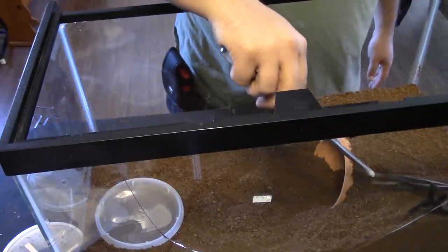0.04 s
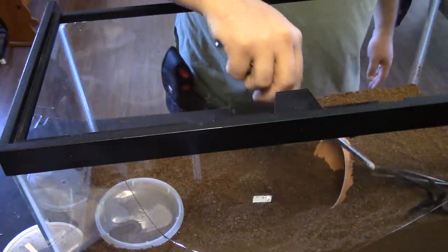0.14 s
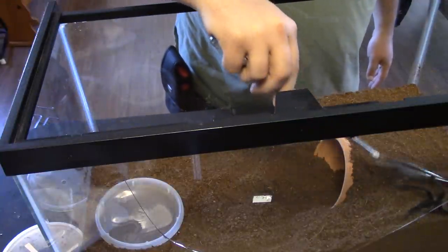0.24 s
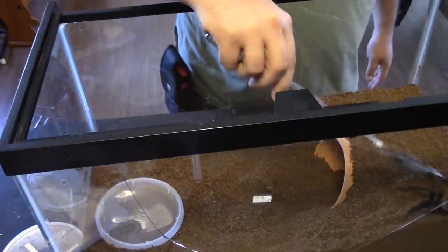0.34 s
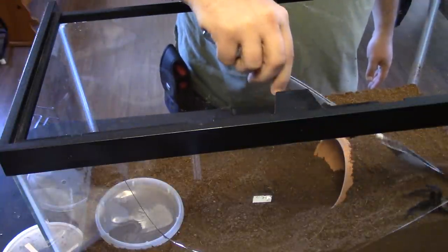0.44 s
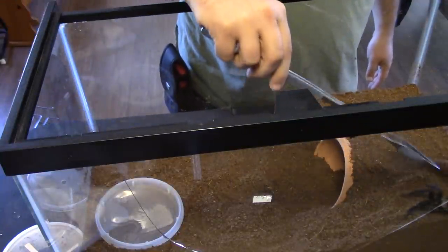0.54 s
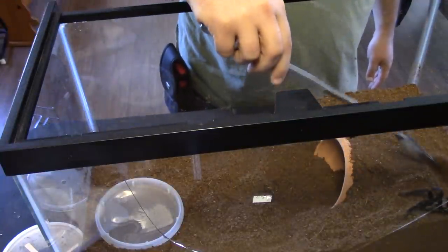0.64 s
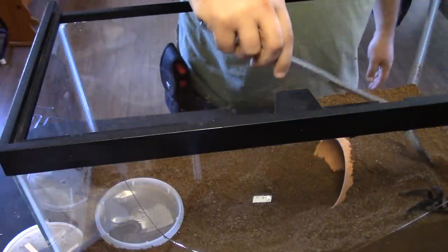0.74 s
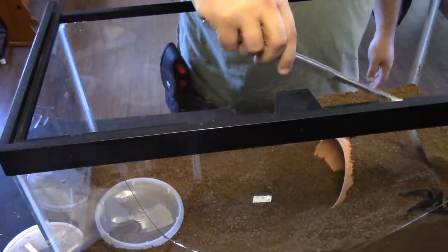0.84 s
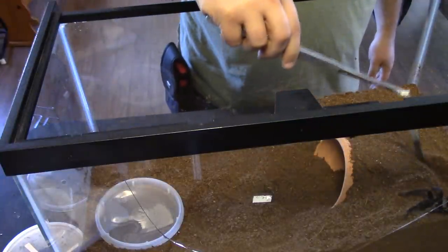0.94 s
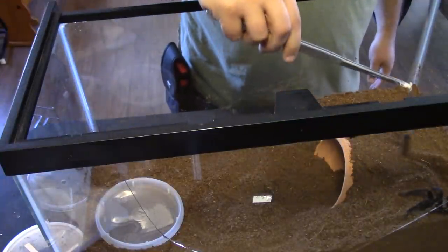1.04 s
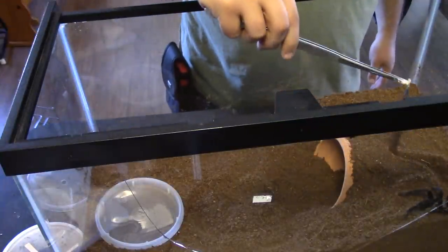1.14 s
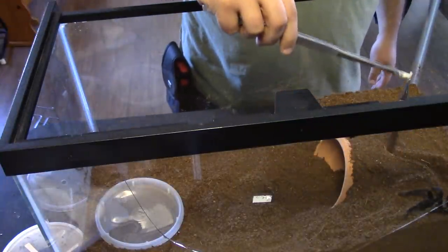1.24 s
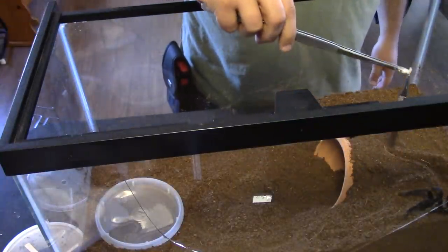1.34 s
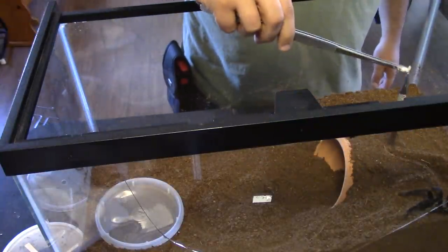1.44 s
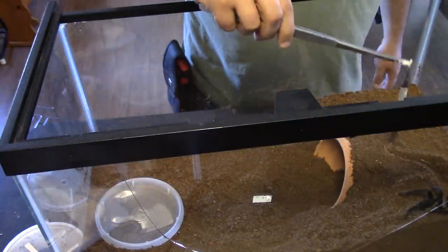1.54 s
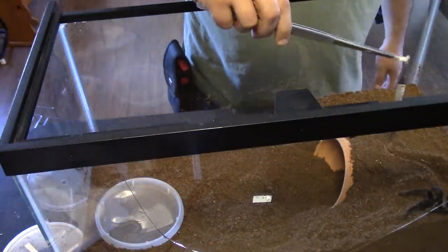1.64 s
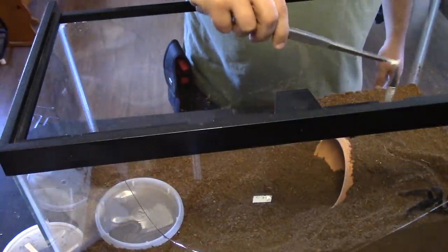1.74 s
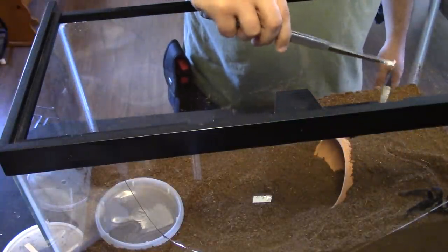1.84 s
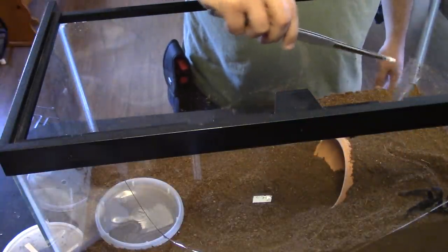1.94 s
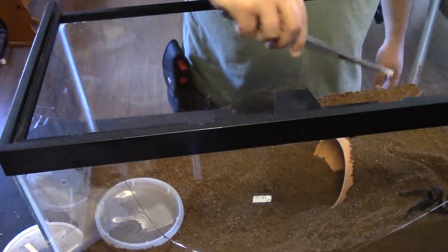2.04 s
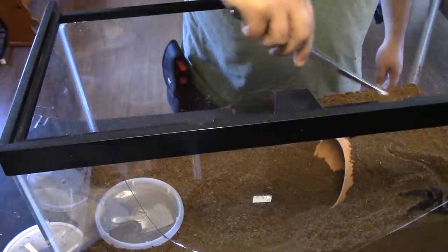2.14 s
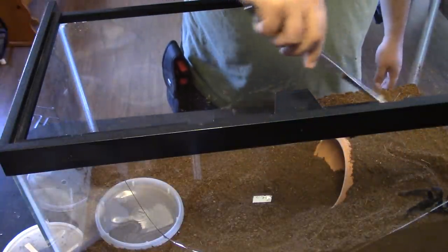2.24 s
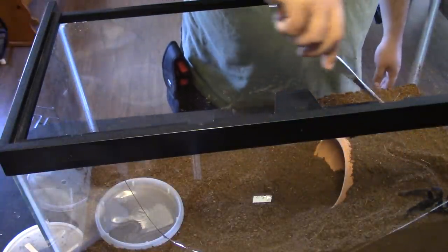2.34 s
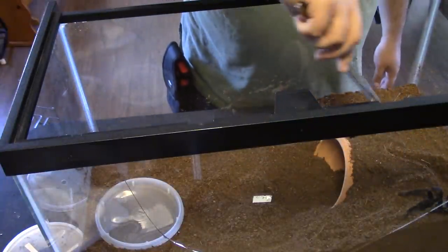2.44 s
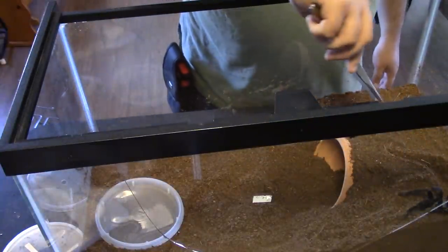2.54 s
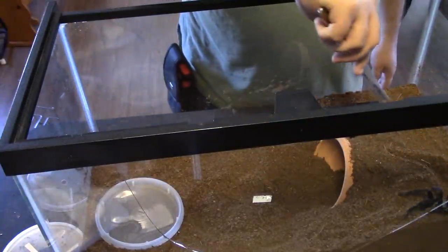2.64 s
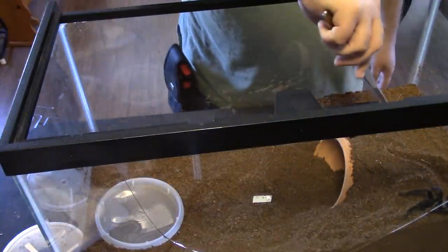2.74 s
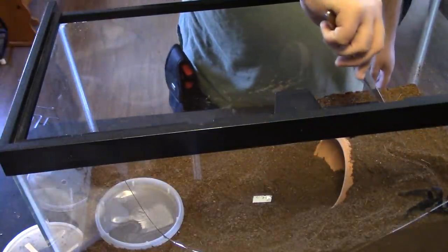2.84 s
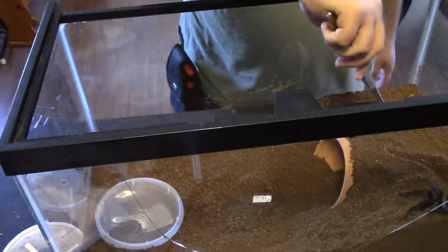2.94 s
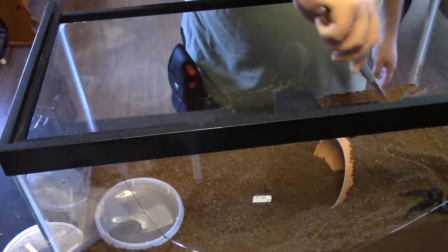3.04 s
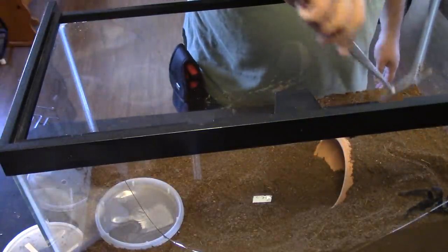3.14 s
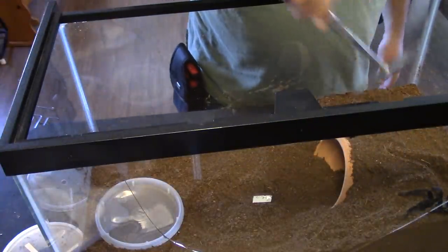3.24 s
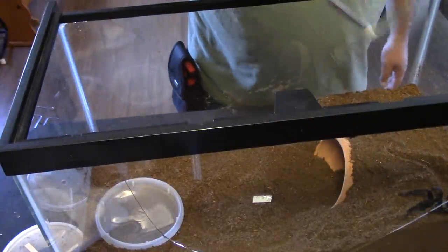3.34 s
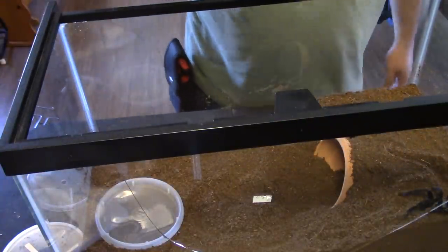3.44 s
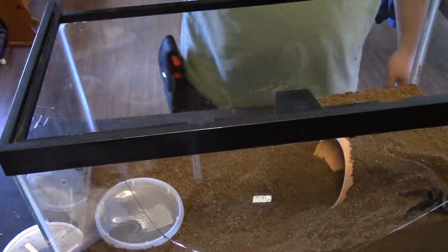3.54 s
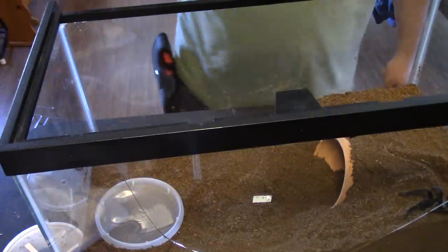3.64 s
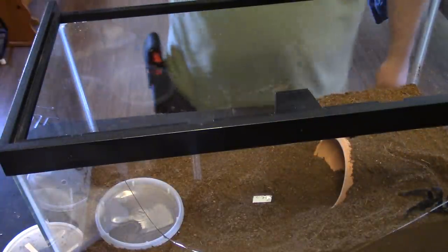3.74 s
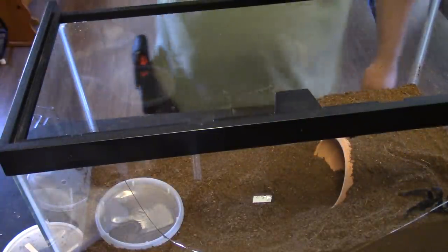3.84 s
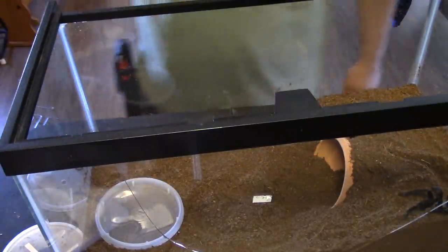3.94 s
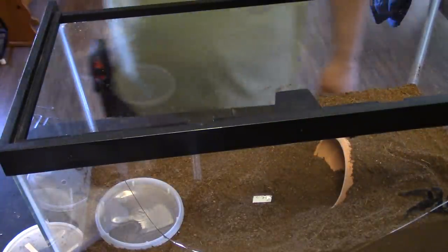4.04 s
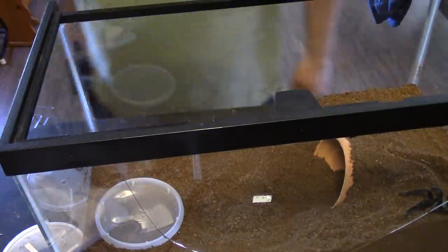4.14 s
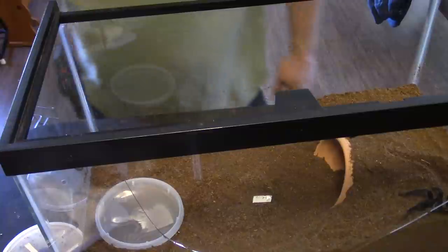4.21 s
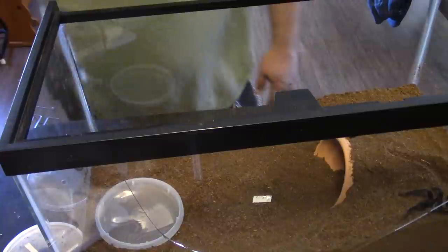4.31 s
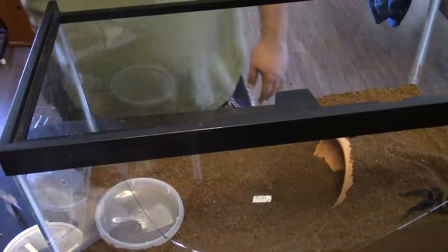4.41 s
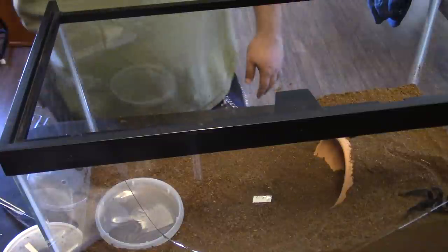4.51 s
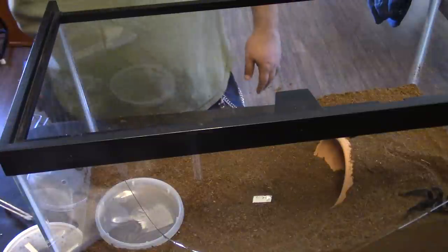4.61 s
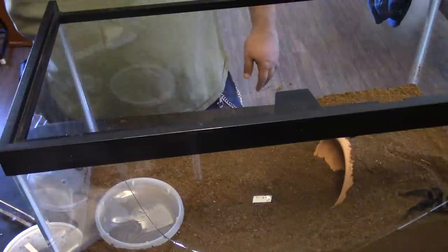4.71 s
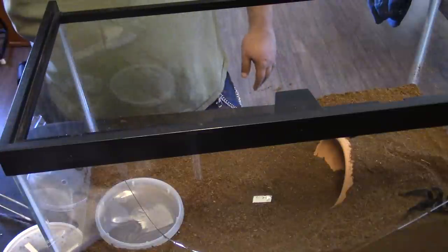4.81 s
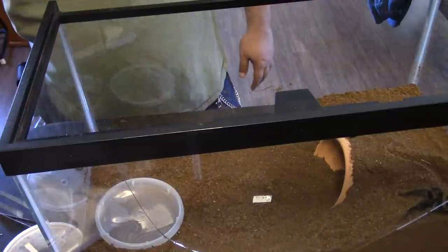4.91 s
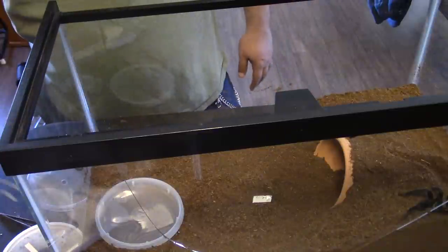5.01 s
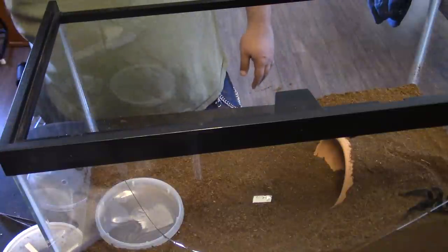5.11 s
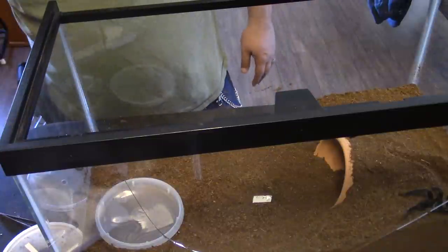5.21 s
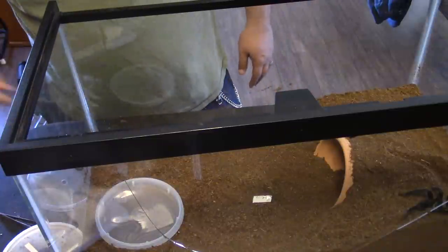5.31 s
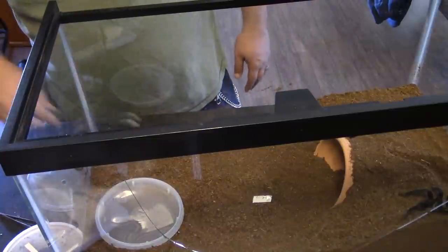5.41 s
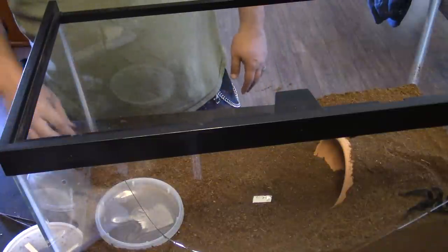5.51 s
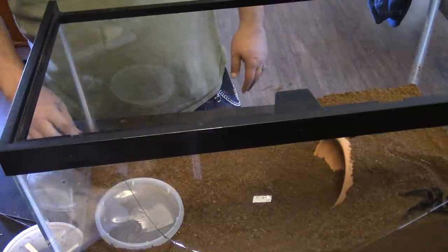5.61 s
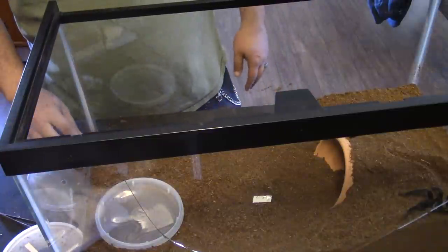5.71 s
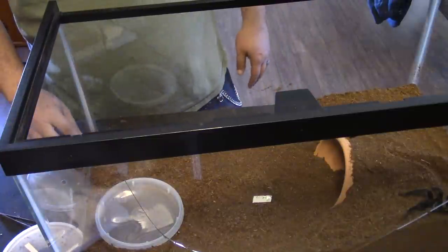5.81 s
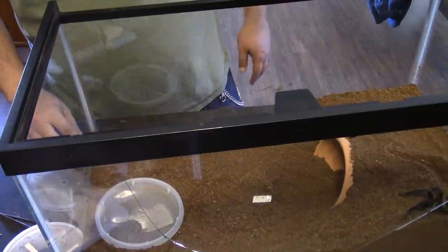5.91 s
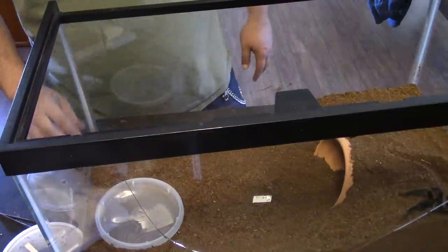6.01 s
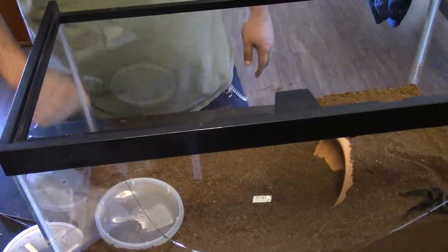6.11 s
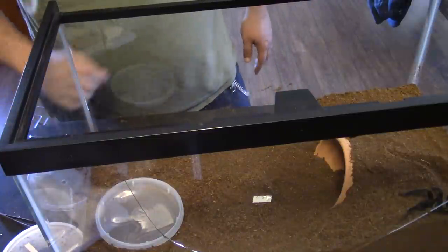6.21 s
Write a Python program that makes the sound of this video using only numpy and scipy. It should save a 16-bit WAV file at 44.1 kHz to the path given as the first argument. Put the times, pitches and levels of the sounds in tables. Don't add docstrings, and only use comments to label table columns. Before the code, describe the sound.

Long steel tongs clink hard and knock on a glass tank, jingle, land clattering on a table, then tumble into a plastic tub.

```python
import sys
import numpy as np
from scipy import signal
from scipy.fft import rfft, irfft, next_fast_len
from scipy.io import wavfile

SR = 44100
rng = np.random.default_rng(int(sys.argv[2]) if len(sys.argv) > 2 else 0)


def unload_wav(signal):
    wavfile.write(
        sys.argv[1],
        SR,
        np.round(np.clip(np.atleast_2d(signal).T, -1, 1) * 32767).astype(np.int16),
    )


def linear_from_db(decibels):
    return 10 ** (np.asarray(decibels, float) / 20)


N = 276154

# [f/Hz, density/(dB per Hz)]
HUSH_MID = [(35, -57.5), (60, -35.5), (112, -6), (242, -10), (394, -7), (533, -9.5), (1800, -20.5),
            (15500, -39)]
HUSH_SIDE = [(15, -37), (25, -20), (287, -2), (598, -5), (1870, -13.5), (9020, -30.5), (11800, -35.5),
             (16400, -49)]
# [f/Hz, width/Hz, level/dB rms]
DRONES = [(124, 12, -68.5), (265, 8.7, -76), (337, 12, -76), (403.8, 24.95, -64)]
# [f/Hz, density/(dB per Hz)]
RUMBLE = [(15, -13), (30, -7), (70, 2.5), (100, -35.5)]
# [t/s, first tick level/dB peak, length/s]
HUNTS = [
    (0, -54, .2),
    (.28, -58, .1),
    (.41, -52.5, .37),
    (1.0, -52, .72),
    (1.95, -55.5, .5),
    (2.411, -57.5, .5),
    (3.15, -57, .4),
    (3.547, -53.5, .85),
    (5.198, -59.5, .45),
]
# [t/s, level/dB peak]
LATE_TICKS = [
    (6.086, -49),
    (6.186, -45),
]

CLINK = [
    (1.8756, 1.5, -12, -31),
]
CLINK_MODES = [(1900, 900, -36), (3150, 110, -13), (4230, 110, -13), (5460, 100, -9), (6800, 170, -16),
               (8280, 140, 2), (9720, 190, 0), (10600, 2500, -24), (11600, 200, -9), (12700, 250, -2),
               (14800, 300, -20)]
CLINK_CROWD = [(290, -65.5), (500, -33), (2840, -15.5), (4600, -17), (7340, -11), (9540, -5.5),
               (13200, -17.5), (16400, -35)]
CLINK_RING = [(2390, -26, .7), (2832, -22, .7), (3780, -27, .6), (4398, -25, .7), (5475, -12, .2),
              (6815, -15, .22), (8301, -4, .11), (8489, -8, .2), (8985, -7, .13), (9722, -9, .18),
              (11520, -4, .12), (11860, -11, .25), (12760, -11, .2), (13360, -9, .15)]
KNOCK = [
    (2.0148, 0.2, -10.5, -30.5),
    (2.0178, -7.5, -23.5, -44.5),
]
KNOCK_MODES = [(263.8, 57, 0), (546.6, 9.2, 9), (914, 74, -2.5), (1126, 100, -3), (1644, 184, -0.5),
               (2280, 180, -5.5), (4665, 170, -4.5), (5625, 410, -13), (6317, 1200, -20), (8470, 170, -28),
               (8600, 230, -25), (11500, 300, -18)]
KNOCK_CROWD = [(71, -51.5), (150, -4.5), (561, -10), (1640, -3.5), (3200, -18), (6300, -22), (10000, -37.5),
               (16400, -33)]
KNOCK_RING = [(3865, -5, .2), (4393, -20, .3), (6040, -24, .25), (7913, -20, .25), (8419, -7, .22),
              (8930, -10, .1), (10320, -1, .085), (11710, -8, .13), (11850, -23, .2), (12640, -6, .086),
              (13360, -15, .12), (14880, -3, .08)]
REBOUND = [
    (2.025, -1.5, 0, -23.5),
]
REBOUND_MODES = [(259, 35, 0), (568.4, 45, 1.5), (1170, 150, -11), (1576, 150, -3), (2030, 120, -4.5),
                 (2470, 200, -10), (3313, 150, -11), (3900, 170, -9.5), (5200, 300, -29), (6170, 200, -29),
                 (8350, 100, -26)]
JINGLE = [
    (2.568, -57, -8, -2),
    (2.603, -49, -12, -12),
    (2.607, -45.5, -15, -9),
    (2.611, -56, -12, -20),
    (2.6839, -17.5, -1, -22),
    (2.6927, -28.5, -28, -8.5),
    (2.699, -30, -24, -15),
]
JINGLE_MODES = [(3340, 250, -15), (5960, 130, -2), (9000, 630, -8.5), (9700, 410, -3), (11040, 250, -13),
                (13000, 160, 3.5)]
JINGLE_CROWD = [(1470, -36), (2500, -18), (5110, -18), (5800, -10), (6420, -18), (12400, -5),
                (15400, -30.5), (16400, -54.5)]
JINGLE_RING = [(3591, -6, .07), (4404, -21, .12), (4867, -22, .14), (5588, -12, .09), (5950, -10, .06),
               (7714, -14, .075), (8926, -11, .16), (9189, -1, .038), (9733, -10, .064), (10170, -14, .09),
               (10320, -13, .15), (10920, -12, .062), (11850, -17, .08), (12810, -9, .066)]
# [t/s, level/dB peak]; clear modes (columns as above)
CHATTER_CONTOUR = [
    (2.7395, -32),
    (2.748, -27.5),
    (2.757, -29),
    (2.768, -34),
    (2.777, -42),
]
CHATTER_MODES = [(3470, 120, -21), (5570, 110, -16), (7790, 22, -7), (8560, 26, -2.5), (9160, 51, -15),
                 (10300, 90, -7), (10306, 28, -8), (10800, 37, -11), (12100, 86, 3), (12900, 150, -19),
                 (14100, 50, -23), (14900, 37, -22)]
CLOSING = [
    (2.8171, -33, -13, -12.5),
    (2.829, -33, -9, -10),
    (2.846, -48, 0, -25),
    (2.856, -42, 0, -16),
    (2.864, -47, 0, -25),
    (2.872, -49, -3, -27),
    (2.88, -39, 0, -28),
    (2.8865, -40, 0, -27),
]
CLOSING_MODES = [(3630, 170, -7), (5800, 170, -6), (8570, 200, -5), (9100, 200, -2), (10600, 200, -8),
                 (12100, 200, -8), (12860, 150, 8)]
CLOSING_RING = [(3850, -7, 0.13), (4420, -15, 0.14), (5750, -2, 0.093), (6045, -6.5, 0.14),
                (8250, -14, 0.17), (9230, -13, 0.23), (10440, -12, .05), (10910, -17, .2), (12090, -6, .05),
                (12830, -17, .15)]
BUMP = [
    (3.0095, -32.5, 27),
    (3.015, -28, 12.5),
    (3.024, -34.5, -10),
    (3.862, -41, -18),
    (3.883, -49, -19),
]
BUMP_MODES = [(237, 15, 4), (797, 55, -14.5), (996, 110, -13)]
BUMP_CROWD = [(59, -43), (100, -1.5), (260, -4.5), (633, -17), (1000, -22), (1440, -35), (2500, -35),
              (3250, -68)]
TAP = [
    (3.0234, -43, -3),
    (3.0448, -20.5, 0),
    (3.0516, -21, -15),
]
TAP_MODES = [(234, 40, -4.5), (934, 167, 3), (1790, 140, -9), (3370, 120, -4.5), (5140, 116, -3.5),
             (5980, 140, -6), (7480, 150, -8), (8270, 270, -5.5), (11300, 230, -17.5), (13000, 300, -11)]
TAP_CROWD = [(88, -13), (150, -1), (1010, -8), (1430, -22), (1820, -8), (6510, -15), (12400, -13.5),
             (16400, -41)]
SETTLING = [
    (3.972, -52, 6),
    (4.42, -38, -9),
    (4.431, -35, -3),
    (4.4365, -33, 0),
    (4.4425, -37, 1),
    (4.4445, -42, 0),
    (4.4478, -43, 0),
    (4.456, -42, 0),
    (4.4665, -37, -3),
]
SETTLING_MODES = [(4800, 900, -3), (6830, 830, -0.5), (8800, 1200, -4), (13000, 1500, -10)]
SET_DOWN = [
    (4.4119, -5.5, 2.5),
    (4.4165, -13.5, -19),
    (4.424, -39, -39),
    (4.4428, -23, -26),
]
SET_DOWN_MODES = [(250, 20, 20), (703, 76, -8), (1480, 180, 10), (2870, 440, 5.5), (7050, 870, -34),
                  (8600, 1100, -6), (13000, 2500, -33)]
SET_DOWN_CROWD = [(71, -58), (237, 2), (450, -13), (675, 0.5), (1540, -7), (2900, -9.5), (13100, -24.5),
                  (16400, -52)]
TABLE = [
    (4.6445, -22.5, -29),
    (4.657, -23.5, -26),
    (4.7045, -25, -23),
    (4.7235, -21.5, -24),
    (4.782, -27, -23),
    (4.787, -26.5, -16),
    (4.791, -24.5, -14),
]
TABLE_MODES = [(235, 23, -30), (480, 110, 11.5), (716, 47, -28.5), (2590, 210, 9), (3680, 230, -3.5),
               (6060, 460, -13)]
TABLE_CROWD = [(71, -60), (191, -5), (680, -0.5), (1890, -5.5), (3300, -9.5), (5040, -22), (12000, -26.5),
               (16400, -70)]
RATTLE = [(4.7046, -33, -10, -6), (4.7134, -38, -16, -22), (4.723, -37, -17, -2), (4.7354, -36, -14, -15),
          (4.782, -27.5, 7, -9), (4.7875, -29, 0, -20), (4.7915, -28.5, 3, -17), (4.797, -36, 0, -13),
          (4.8033, -27.5, 0, -12.5), (4.8094, -34, -14, -15), (4.8755, -40, -2, -30), (4.896, -49, -2, -30)]
RATTLE_MODES = [(6100, 150, -6), (7700, 140, 11), (10800, 150, 4), (13900, 58, -6)]
RATTLE_CROWD = [(2350, -31), (4000, -12), (5090, -18), (7650, -11), (9750, -10.5), (13200, -8),
                (15500, -23), (16400, -40)]
RATTLE_RING = [(3903, -20, .2), (5486, -12, .22), (5997, -8, .15), (6600, -16, .12), (7655, -11, .22),
               (8450, -14, .15), (9259, -12, .12), (10330, -12, .2), (10900, -14, .12), (11770, -10, .18),
               (12840, 0, .06), (13560, -12, .1), (14850, -10, .12)]
DROP = [
    (4.8753, -12.5, 9),
    (4.8851, -29, 3),
    (4.8951, -17, 1),
    (4.906, -28, -9),
    (4.911, -25.5, 7),
    (4.926, -44, -34),
]
DROP_MODES = [(447, 40, -1), (694, 40, -1), (991, 90, -5), (1700, 120, -10), (2600, 180, 6), (2950, 200, 2),
              (3680, 200, 3), (5960, 250, -13), (6590, 250, -13)]
TUB = [
    (5.5205, -41, 2, -40),
    (5.528, -45, -15, -41),
    (5.5645, -12.5, -16, -21),
    (5.5666, -12.5, -29, -33),
    (5.7545, -30.5, -36, -42),
]
TUB_MODES = [(612, 184, -3), (960, 80, -14), (1485, 99, 5), (2774, 180, -6), (3230, 75, -11),
             (3970, 110, -13), (4720, 100, -19), (5120, 150, -17), (6310, 180, -13), (7150, 120, -21)]
TUB_CROWD = [(120, -17), (520, -13.5), (1180, -24.5), (1500, -8), (1900, -27), (2800, -25), (4400, -30.5),
             (16400, -40)]
TUB_RING = [(1450, -2, 0.064), (2690, -5, 0.21), (3280, -5.5, 0.23), (3850, -12, 0.12), (5270, -13, 0.23),
            (6550, -21, .18)]
ROCK = [
    (5.7975, -15.5, -2),
    (5.805, -33, -1),
    (5.814, -16.5, -9.5),
]
ROCK_MODES = [(260, 15, -3.5), (460, 19, 1), (707, 30, -1.5), (1380, 73, -9), (1860, 120, -15),
              (2770, 86, -15.5), (3600, 100, -32), (4420, 88, -37), (5340, 260, -46), (6300, 300, -30),
              (8500, 110, -39), (9100, 160, -36.5)]
TUMBLE = [
    (5.8332, -14, -19, -60),
    (5.8365, -14.5, -40, -60),
    (5.844, -11.5, -10, -22),
    (5.8495, -13.5, -37, -63),
    (5.856, -17.5, -25, -60),
    (5.8605, -13, -28, -57),
    (5.8635, -19, -25, -60),
    (5.877, -23, -28, -60.5),
]
TUMBLE_MODES = [(262, 17, 0), (442, 27, -6), (755, 22, -3), (826, 78, -5.5), (1376, 68, -4.5),
                (2060, 130, -5.5), (2760, 150, -8.5), (3740, 460, -14), (6500, 680, -23)]
TUMBLE_CROWD = [(100, -50), (257, -8.5), (343, -24), (448, -16.5), (1360, -16), (2090, -20), (5280, -30),
                (16400, -53.5)]
TUMBLE_RING = [(3640, 4, .28), (5809, -5, .3), (8533, -15, .36), (10900, -19, .3), (11630, -18, .3),
               (15160, -23, .28)]

# [f/Hz, t60/s, level/dB]
ROOM = [(117, 0.074, -1), (495, 0.29, -0.5), (2000, 0.26, -1.5), (6090, 0.28, -3.5), (14000, 0.23, -2)]
# [t of peak/s, level/dB peak, swell/s, fade/s]
RUSTLE = [
    (3.39, -63.5, 0.043, .05),
    (3.53, -63, 0.092, 0.096),
    (4.205, -57.5, 0.11, 0.12),
    (4.12, -63, 0.6, 0.6),
    (4.65, -58, .5, 0.43),
]
# [f/Hz, density/(dB per Hz)]
RUSTLE_COLOUR = [(400, -21), (1500, 10), (3800, 3), (5500, -1), (8000, -6), (14000, -17.5), (17000, -40)]


def at_hz(points, hz):
    points = np.array(points)
    return np.interp(np.log(hz + 1e-9), np.log(points[:, 0]), points[:, 1])


def coloured(spectrum, size=N):
    fast = next_fast_len(size)
    hz = np.fft.rfftfreq(fast, 1 / SR)
    noise = irfft(rfft(rng.standard_normal(fast)) * linear_from_db(at_hz(spectrum, hz)), fast)[:size]
    return noise / noise.std()


def filtered(x, order, hz, kind="low"):
    return signal.sosfilt(signal.butter(order, hz, kind, fs=SR, output="sos"), x)


def add(out, at_s, sound):
    i = round(at_s * SR)
    out[i:i + len(sound)] += sound[:N - i]


def hush():
    out = linear_from_db(-56.5) * filtered(coloured(HUSH_MID), 2, 14500)
    for hz, width_hz, level_db in DRONES:
        peak = [(hz - 4 * width_hz, -60), (hz, 0), (hz + 4 * width_hz, -60)]
        out = out + linear_from_db(level_db) * coloured(peak)
    return out


def focus_motor():
    tick_hz, tick_s, period_s, first_s = 1887, 0.00886, 2002 / 30000, .02
    settle_db_per_s, rest_db = 6, -63.5
    out = np.zeros(N)
    t = np.arange(round(tick_s * SR)) / SR
    tick = np.sin(2 * np.pi * tick_hz * t) * np.sin(np.pi * t / tick_s) ** 2
    at_s = np.arange(first_s, N / SR, period_s)
    hunts_db = []
    for start_s, first_db, length_s in HUNTS:
        active = (at_s >= start_s) & (at_s < start_s + length_s)
        hunts_db.append(np.where(active, first_db - settle_db_per_s * (at_s - start_s), rest_db))
    levels_db = np.max(hunts_db, axis=0) + rng.normal(0, 1.5, len(at_s))
    at_s = at_s + rng.normal(0, .0015, len(at_s))
    for s, peak_db in list(zip(at_s, levels_db)) + LATE_TICKS:
        add(out, s, linear_from_db(peak_db) * tick)
    return out


def decaying(hz, db, t60_s, length_s, signs, contact_s):
    t = np.arange(round(length_s * SR), dtype=np.float32)[:, None] / np.float32(SR)
    turn = np.float32(2 * np.pi * hz)
    fade = np.float32(np.log(1000) / t60_s)
    waves = np.sin(turn * t) * np.exp(np.maximum(-fade * t, -40))
    waves = waves * (1 - np.exp(-np.minimum(t / np.float32(contact_s), 5) ** 2))
    return waves @ np.float32(signs * linear_from_db(db))


def ringing(ring, level_db, chance, contact_s, swell_s):
    twin_split, twin_db, swell_below_hz = .004, -14, 4600
    hz, db, t60_s = np.transpose(ring)
    db = level_db + db + chance[-len(ring):]
    hz = np.r_[hz, hz * (1 + twin_split * chance[:len(ring)])]
    t60_s = np.tile(np.clip(t60_s, .02, .7), 2)
    rise_s = np.where(hz < swell_below_hz, swell_s, contact_s)
    return decaying(hz, np.r_[db, db + twin_db], t60_s, 0.52, np.sign(chance[:len(hz)]), rise_s)


def strikes(touches, modes, crowd, ring=None, crowd_db=-3.0, crowd_t60_s=.03, contact_s=0.000043,
            sharp=False, swell_s=0.00087):
    out, count, spread_db = np.zeros((2, N)), 70, 2
    mode_hz, width_hz, mode_db = np.transpose(modes)
    mode_db = mode_db + 20 * np.log10(width_hz)
    mode_t60_s = np.log(1000) / np.pi / width_hz
    low, high = np.sqrt([crowd[0][0], crowd[-1][0]])
    usual_db = np.mean([touch[2] for touch in touches])
    luck = rng.normal(0, 1, (len(touches), 2 * count))
    places = rng.random((len(touches), count))
    for (s, peak_db, bright_db, *share_db), chance, place in zip(touches, luck, places):
        crowd_hz = (low + (high - low) * (np.arange(count) + place) / count) ** 2
        t60_s = crowd_t60_s * (crowd_hz / 2000) ** -.4
        small_db = at_hz(crowd, crowd_hz) + 5 * np.log10(crowd_hz) - 10 * np.log10(t60_s)
        hz = np.r_[mode_hz, crowd_hz]
        db = np.r_[mode_db - mode_db.max(), small_db - small_db.max() + crowd_db]
        tilt_db = 0.21 * (bright_db - usual_db) * np.log2(hz / crowd_hz[count // 2])
        db = db + tilt_db + spread_db * chance[:len(hz)]
        signs = np.sign(chance[::-1][:len(hz)] + 9 * sharp)
        blow = decaying(hz, db, np.r_[mode_t60_s, t60_s], .1, signs, contact_s)
        add(out[0], s, linear_from_db(peak_db) * blow / np.abs(blow).max())
        if ring:
            add(out[1], s, ringing(ring, peak_db + share_db[0], chance, contact_s, swell_s))
    return out


def tongs_in_hand():
    gap_s, jitter_s = .0036, 0.0012
    clink = strikes(CLINK, CLINK_MODES, CLINK_CROWD, CLINK_RING, crowd_db=-23.0, crowd_t60_s=.04,
                    contact_s=.00006, sharp=True, swell_s=.045)
    jingle = strikes(JINGLE, JINGLE_MODES, JINGLE_CROWD, JINGLE_RING, crowd_db=-18.0, crowd_t60_s=0.075,
                     contact_s=0.0002)
    chatter_s = np.arange(CHATTER_CONTOUR[0][0], CHATTER_CONTOUR[-1][0], gap_s)
    chatter_s = chatter_s + rng.normal(0, jitter_s, len(chatter_s))
    chatter_db = np.interp(chatter_s, *np.transpose(CHATTER_CONTOUR))
    touches = [(s, db, 0) for s, db in zip(chatter_s, chatter_db)]
    chatter = strikes(touches, CHATTER_MODES, JINGLE_CROWD, crowd_db=-15.0, crowd_t60_s=0.063,
                      contact_s=0.00024)
    closing = strikes(CLOSING, CLOSING_MODES, JINGLE_CROWD, CLOSING_RING, crowd_db=-17.5, crowd_t60_s=0.074,
                      contact_s=0.0003)
    return clink + jingle + chatter + closing


def grain(size):
    jumps = linear_from_db(2.5 * rng.standard_normal(size // 64 + 2))
    jumps = jumps / np.sqrt(np.mean(jumps ** 2))
    return np.interp(np.arange(size) / 64, np.arange(len(jumps)), jumps)


def shiver(touches, crowd, level_db, t60_s, dull_hz, modes=(), modes_db=0.0, width_hz=50.0):
    out, t = np.zeros(N), np.arange(2 ** 14) / SR
    for s, peak_db, *_ in touches:
        envelope = linear_from_db(peak_db + level_db - 60 * t / t60_s) * np.minimum(t / 0.0035, 1)
        add(out, s, envelope * coloured(crowd, size=len(t)) * grain(len(t)))
    flicker = 0
    for hz, *_ in modes:
        flicker = flicker + signal.lfilter(*signal.iirpeak(hz, hz / width_hz, fs=SR), out + 1e-18)
    return filtered(out + linear_from_db(modes_db) * flicker, 2, min(dull_hz, .45 * SR))


def buzzing():
    steel = shiver(CLINK, CLINK_CROWD, level_db=-37.5, t60_s=0.26, dull_hz=13950,
                   modes=CLINK_RING[4:], modes_db=7.0, width_hz=47.0)
    steel = steel + shiver(RATTLE, RATTLE_CROWD, level_db=-22.5, t60_s=0.28, dull_hz=16000,
                           modes=RATTLE_RING, modes_db=9.5, width_hz=70.0)
    tank = shiver(KNOCK[:1] + REBOUND, KNOCK_CROWD, level_db=-24.5, t60_s=0.3, dull_hz=12000)
    tank = tank + shiver(TAP, TAP_CROWD, level_db=-30.5, t60_s=0.25, dull_hz=9960,
                         modes=TAP_MODES[1:], modes_db=8.0, width_hz=90.0)
    table = shiver(SET_DOWN[:1], SET_DOWN_CROWD, level_db=-21.5, t60_s=0.34, dull_hz=15900)
    table = table + shiver(TABLE + DROP, TABLE_CROWD, level_db=-17.5, t60_s=0.3, dull_hz=7940)
    tub = shiver(TUB, TUB_CROWD, level_db=-27, t60_s=0.42, dull_hz=9100,
                 modes=TUB_MODES[3:], modes_db=8.5, width_hz=100.0)
    tub = tub + shiver(ROCK, TUMBLE_CROWD, level_db=-18.5, t60_s=0.46, dull_hz=2550)
    tub = tub + shiver(TUMBLE, TUMBLE_CROWD, level_db=-18, t60_s=0.34, dull_hz=6170)
    return steel + tank + table + tub


def room(x):
    rise_s, side_db = 0.014, -24
    t = np.arange(SR // 2) / SR
    white, tail = rng.standard_normal((2, len(t))), 0
    for hz in 62.5 * 2 ** np.arange(9):
        edges_hz = [hz / np.sqrt(2), min(hz * np.sqrt(2), .45 * SR)]
        t60_s = at_hz(ROOM, hz)
        level_db = at_hz(np.array(ROOM)[:, ::2], hz)
        fade = linear_from_db(level_db - 60 * t / t60_s) / np.sqrt(SR * t60_s / np.log(1e6))
        tail = tail + filtered(white, 2, edges_hz, "band") * fade
    tail = tail * (1 - np.exp(-(t / rise_s) ** 2))
    return signal.fftconvolve(x[None], tail, axes=1)[:, :N] * linear_from_db(np.array([[0], [side_db]]))


def tank_blows():
    knock = strikes(KNOCK, KNOCK_MODES, KNOCK_CROWD, KNOCK_RING, crowd_db=-19.0, crowd_t60_s=0.032,
                    contact_s=0.00026, swell_s=.02)
    rebound = strikes(REBOUND, REBOUND_MODES, KNOCK_CROWD, KNOCK_RING, crowd_db=-20.0, crowd_t60_s=0.047,
                      contact_s=0.00039, swell_s=0.019)
    bump = strikes(BUMP, BUMP_MODES, BUMP_CROWD, crowd_db=-6.5, crowd_t60_s=0.017, contact_s=0.0015)
    tap = strikes(TAP, TAP_MODES, TAP_CROWD, crowd_db=-23.5, crowd_t60_s=0.062, contact_s=0.00073)
    return knock + rebound + bump + tap


def rustle():
    t, power = np.arange(N) / SR, 0
    for s, peak_db, swell_s, fade_s in RUSTLE:
        away = np.where(t < s, (s - t) / swell_s, (t - s) / fade_s)
        power = power + linear_from_db(peak_db - 20 * away) ** 2
    return np.sqrt(power) * coloured(RUSTLE_COLOUR)


def table_blows():
    settling = strikes(SETTLING, SETTLING_MODES, RATTLE_CROWD, crowd_db=-17.0, crowd_t60_s=0.0076,
                       contact_s=0.0001)
    set_down = strikes(SET_DOWN, SET_DOWN_MODES, SET_DOWN_CROWD, crowd_db=-12.5, crowd_t60_s=0.012,
                       contact_s=0.0001, sharp=True)
    knocks = strikes(TABLE, TABLE_MODES, TABLE_CROWD, crowd_db=-10.0, crowd_t60_s=0.009, contact_s=0.00014)
    rattle = strikes(RATTLE, RATTLE_MODES, RATTLE_CROWD, RATTLE_RING, crowd_db=2.0, crowd_t60_s=0.051)
    drop = strikes(DROP, DROP_MODES, TABLE_CROWD, crowd_db=-18.5, crowd_t60_s=0.022, contact_s=0.00036)
    return settling + set_down + knocks + rattle + drop


def tub_blows():
    knocks = strikes(TUB, TUB_MODES, TUB_CROWD, TUB_RING, crowd_db=-18.5, crowd_t60_s=0.06, contact_s=0.00027)
    rock = strikes(ROCK, ROCK_MODES, TUMBLE_CROWD, crowd_db=-18.0, crowd_t60_s=0.018, contact_s=0.00026)
    tumble = strikes(TUMBLE, TUMBLE_MODES, TUMBLE_CROWD, TUMBLE_RING, crowd_db=-20.0, crowd_t60_s=0.03,
                     contact_s=0.0003, swell_s=.05)
    return knocks + rock + tumble


def scene():
    ring_wet, mic_low_hz = .55, 125.1
    clinks, clink_ring = tongs_in_hand()
    blows, blow_ring = tank_blows() + table_blows() + tub_blows()
    near = clinks + clink_ring + (1 - ring_wet) * blow_ring
    far = blows + ring_wet * blow_ring + buzzing()
    wet_mid, wet_side = room(linear_from_db(-16) * near + far)
    blows_mid, blows_side = filtered([near + far + wet_mid, wet_side], 3, mic_low_hz, "high")
    mid = blows_mid + hush() + linear_from_db(-83.5) * coloured(RUMBLE) + rustle() + focus_motor()
    treble = filtered(near + far, 2, 3000, "high")
    off_body = linear_from_db(-18.0) * np.roll(treble, 25)
    side = blows_side + off_body + linear_from_db(-66) * coloured(HUSH_SIDE)
    return np.array([mid + side, mid - side])


def band_limit(x):
    return signal.sosfilt(signal.butter(12, 16530, fs=SR, output="sos"), x)


def record(dry):
    treble_end_hz = 15800
    dull = filtered(dry, 10, treble_end_hz)
    return band_limit(np.clip(dull, -1, 1))


dry = scene()
out = record(dry)
unload_wav(out)
```